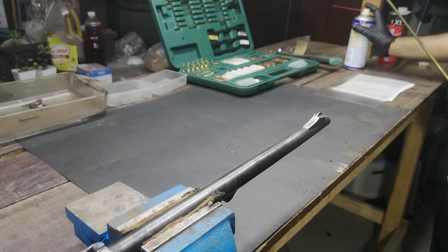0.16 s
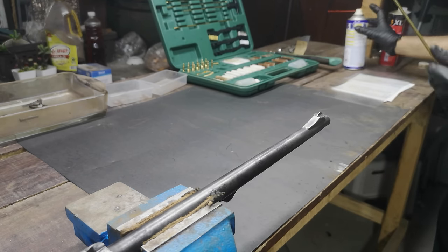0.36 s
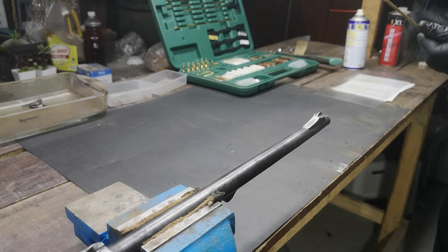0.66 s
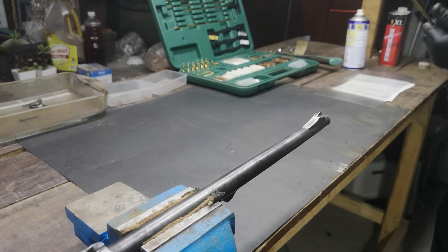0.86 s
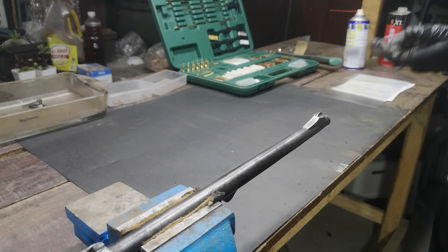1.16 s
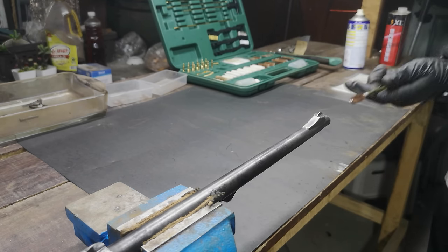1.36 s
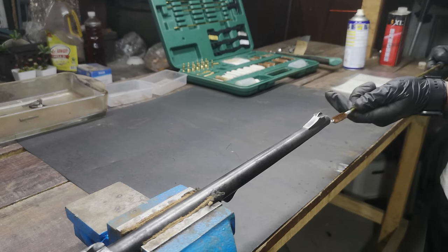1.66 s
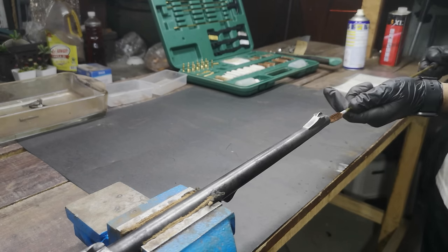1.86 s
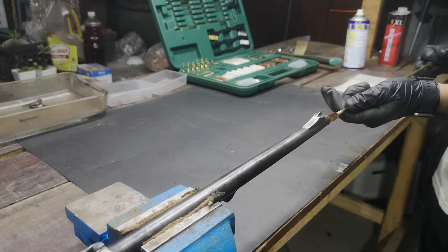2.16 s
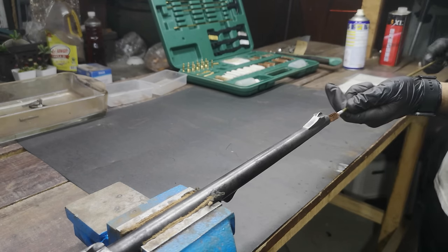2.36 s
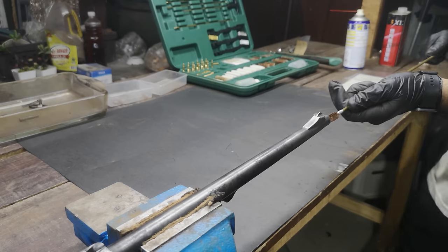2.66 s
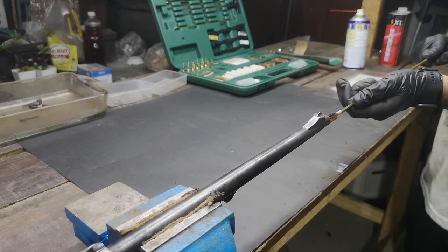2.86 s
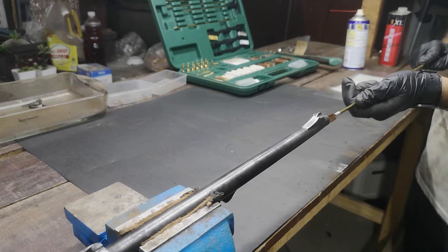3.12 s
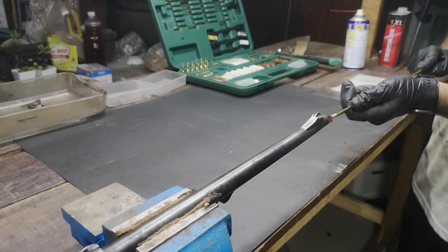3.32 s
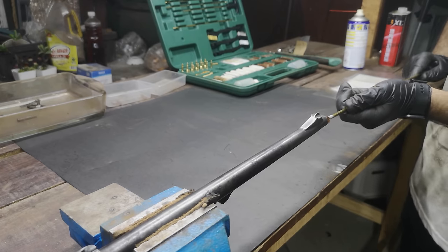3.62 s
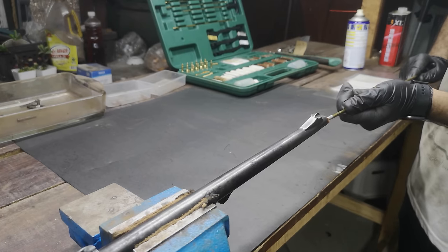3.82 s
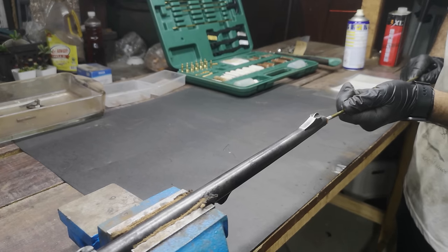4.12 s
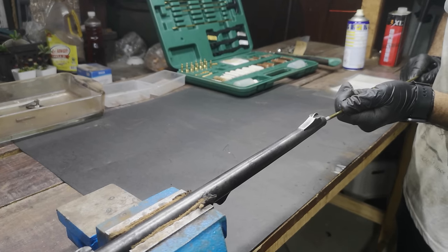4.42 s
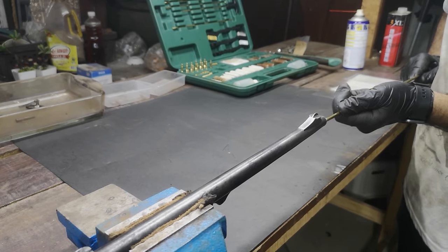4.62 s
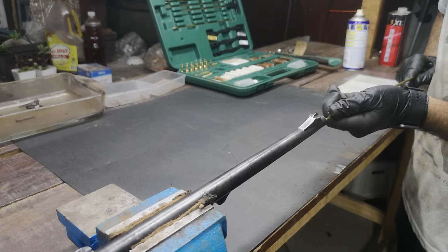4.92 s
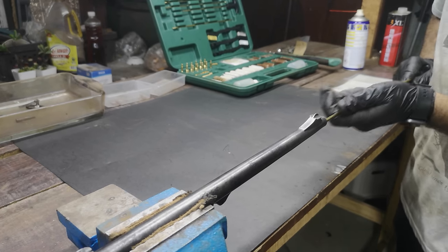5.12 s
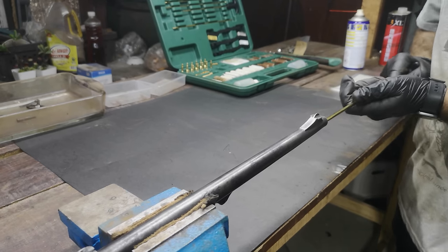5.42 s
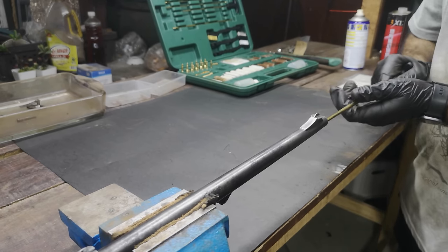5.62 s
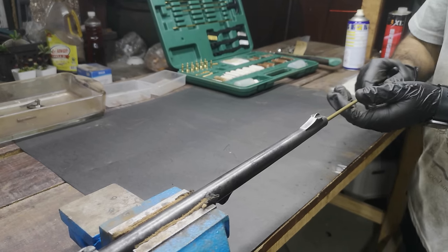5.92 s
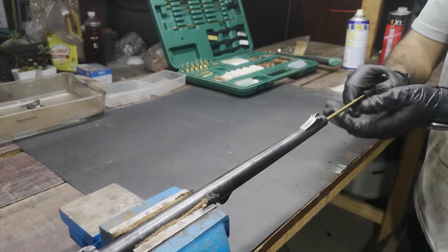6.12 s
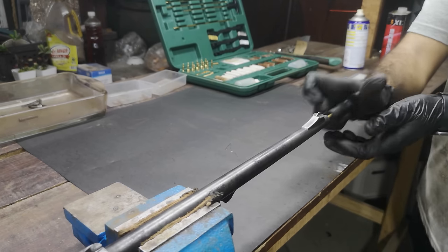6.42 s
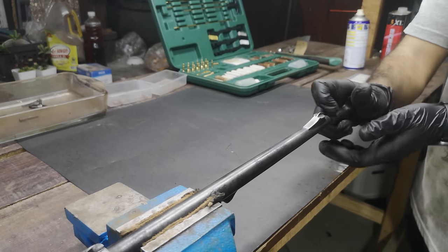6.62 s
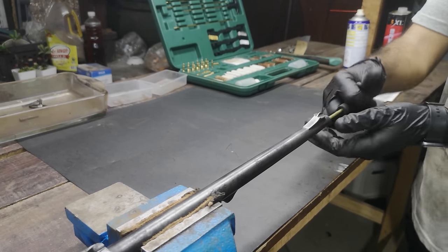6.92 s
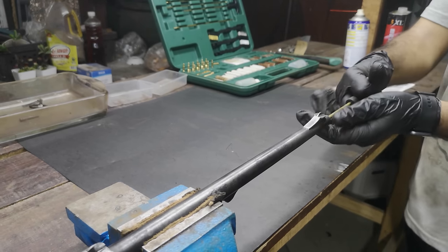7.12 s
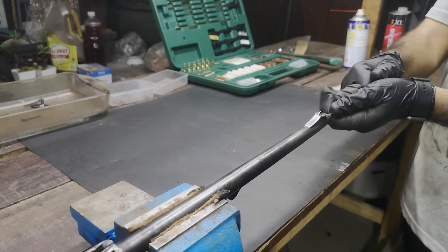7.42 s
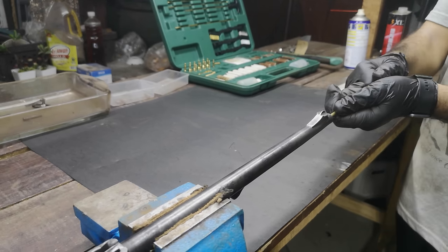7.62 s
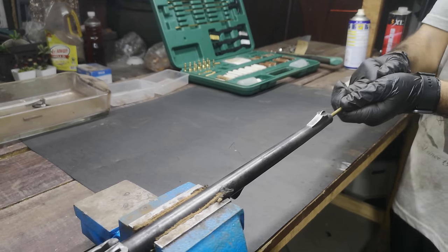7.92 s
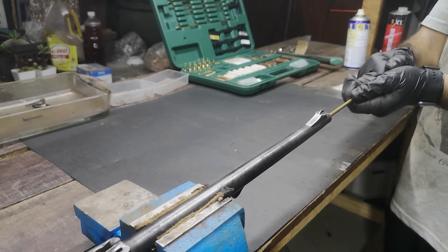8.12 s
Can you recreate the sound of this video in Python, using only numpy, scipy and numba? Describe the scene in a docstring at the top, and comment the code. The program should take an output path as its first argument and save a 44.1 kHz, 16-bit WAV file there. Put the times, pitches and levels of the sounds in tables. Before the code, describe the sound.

A can thumps onto wood, wobbles and settles, leaving near quiet. A bristle brush scratches lightly at the mouth of a metal barrel, then rasps inside it in uneven pushes, the longest sinking in pitch and fading. Sharp steel ticks ring briefly; the rod bumps, a rubber glove squeaks dully and snaps, and the bench shudders softly. Nearby stereo microphones catch short, dense room reflections over a low rumble and faint high whine.

```python
"""A spray can lands on a wooden bench and rocks on its rim; a glove then slides along the rod of a bristle brush.
The bristles flick over the muzzle of a steel barrel held in a vise, then rasp down the bore in short and long pushes.
Along the way come sharp ticks with a steel ring and bumps of the rod; the glove groans and snaps, the bench shudders.
Friction is a train of uneven slips, impact an impulse with chatter; both excite resonant bodies.
A small, live workshop adds dense reflections; faint rumble and a whine persist throughout."""
import sys
import numpy as np
from scipy import signal
from scipy.fft import rfft, irfft
from scipy.io import wavfile
from numba import njit

SR = 44100
rng = np.random.default_rng(int(sys.argv[2]) if len(sys.argv) > 2 else 0)


def bounce(signal):
    """Save signal as a 16-bit WAV file at the path given by the first command-line argument."""
    frames = np.transpose(np.atleast_2d(signal))
    limited = np.clip(frames, -1, 1)
    pcm = np.round(limited * 32767).astype(np.int16)
    wavfile.write(sys.argv[1], SR, pcm)


N = 364707
TIME = np.arange(N) / SR
CLOCK = TIME[::32]  # coarse time axis for the hand's motion
TAPS = 16384  # length of the impulse responses, samples
GRID = np.maximum(np.arange(TAPS // 2 + 1) * SR / TAPS, 1)  # their frequency axis, Hz

# Event levels and colours are relative: each source is scaled again when it is mixed.
# Treble levels are relative to the band below 4500 Hz.

# workshop rumble, spectral density: hz, level_db
AIR_COLOUR = [(15, -33.5), (25, -8), (45, -5), (110, -8), (200, -16.5), (340, -15.5), (520, -25.5),
              (920, -32.5), (1700, -30), (4400, -37), (7300, -38.5), (11000, -48.5), (15500, -52.5)]
AIR_DB = -66.5
WHINE_HZ, WHINE_WIDTH_HZ, WHINE_DB = 7430, 140, -81
# workshop decay time to -60 dB: hz, t60_s
ROOM_T60 = [(100, .3), (500, 0.24), (1500, 0.26), (3000, 0.22), (7000, 0.24), (15000, 0.11)]
# correlation of diffuse sound at the two microphones: hz, likeness (-1 to 1)
LIKENESS = [(60, 1), (150, 1), (280, 0.54), (520, 0.059), (1100, 0.056), (2500, -0.04), (5000, -0.06),
            (12000, -0.78)]
# colour difference of the microphones, left minus right: hz, difference_db
LEAN = [(100, 1), (500, -2), (1300, -1.2), (2400, -2.2), (4400, -2), (6800, -5), (7800, 0), (8800, 5),
        (15000, 10)]
CUTOFF_HZ = 15350

# can landing on the bench: time_s, impulse_db
LANDING = [(0.341, -24), (0.357, -20.5), (0.363, -6), (0.37, -17.5), (0.396, -13.5)]
# can rocking on its rim: time_s, impulse_db
ROCKING = [(0.5332, -8.5), (0.5844, -19), (0.6144, -19.5), (0.6629, -22.5)]
# bench booming as the can lands and as it tips back: start_s, rise_s, hold_s, level_db
BOOM = [(.345, .024, 0.1, -12.5), (.53, 0.027, 0.15, -15.5)]
# bench shuddering under hands that lean on the work: start_s, rise_s, hold_s, level_db
SHUDDERS = [(2.6, 0.078, 0.063, -50.5), (3.3, 0.061, 0.043, -57.5), (4.34, 0.1, 0.063, -40.5),
            (4.66, 0.074, .01, -37.5), (4.82, 0.063, .08, -42), (5.12, 0.18, 1, -49),
            (6.24, 0.038, 0.23, -44.5), (6.5, 0.073, 0.18, -26.5), (7.07, 0.22, 0.043, -34.5),
            (7.38, 0.071, 0.19, -42), (7.6, 0.063, 0.17, -31.5), (7.9, 0.33, 0.063, -34.5)]
BOOM_SAG_DB_PER_S, BOOM_RELEASE_DB_PER_S = 36, 223
SHUDDER_RELEASE_DB_PER_S = 240

# glove sliding along the rod: start_s, rise_s, hold_s, level_db, treble_db
SLIDES = [(1.02, .04, 0.017, -74, 13), (1.228, 0.032, 0.054, -76, 30), (1.308, 0.011, 0.012, -54.5, 10.5),
          (1.45, 0.016, 0.016, -82, 16), (5.98, 0.24, 0.63, -52.5, 6), (7.045, 0.14, .03, -40, -13),
          (7.16, 0.064, 0.068, -35.5, -2.5), (7.41, 0.04, 0.093, -48, -2), (7.92, 0.082, 0.41, -37.5, 3.5)]
# glove snapping on the rod: time_s, impulse_db
SNAPS = [(7.2452, -14.5), (7.351, -20)]
# rod groaning as the grip tightens: start_s, rise_s, hold_s, level_db
GROAN = [(7.07, 0.25, 0.024, -39)]
SLIDE_SAG_DB_PER_S, SLIDE_RELEASE_DB_PER_S = 29, 280
GROAN_RELEASE_DB_PER_S = 77
GROAN_FIRST_HZ, GROAN_REST_HZ, GROAN_SETTLE_S = 218, 164, 0.0804

# sharp ticks with a steel ring, some led by a fainter click about 17 ms earlier: time_s, tick_db, ring_db
TICKS = [(4.3352, -31, -46), (4.3526, -11.5, -30), (4.6603, -29.5, -41.5), (4.6777, -9, -31),
         (7.6211, -24.5, -46), (7.6385, -11, -29), (7.655, -19, -33.5), (7.6682, -15.5, -48),
         (7.682, -21, -65), (7.7819, -27, -72), (7.7997, -9, -36.5)]
# rod bumping the muzzle as the grip changes: time_s, impulse_db
BUMPS = [(6.6185, -8), (6.6703, -5.5)]

# bristles flicked against the muzzle: start_s, rise_s, hold_s, level_db, treble_db
MUZZLE = [(2.31, .08, 0.088, -49.5, -4), (2.568, 0.057, 0.027, -27.5, -1.5),
          (2.755, 0.016, 0.028, -56.5, -7), (2.98, 0.045, 0.056, -64, -4), (3.135, 0.026, 0.011, -45, -4),
          (3.297, 0.045, 0.035, -31.5, -2.5)]
FLICK_SAG_DB_PER_S, FLICK_RELEASE_DB_PER_S = 32, 222
# short pushes in the bore: start_s, rise_s, hold_s, level_db, treble_db, first_rasp_hz, rasp_lift_db
PUSHES = [(3.458, 0.031, 0.028, -37, -16, 1400, -38), (3.679, 0.041, 0.0062, -38.5, -13.5, 1400, 8.5),
          (3.867, 0.058, 0.022, -65.5, -7.5, 1410, 4), (4.059, 0.047, 0.14, -63, -5.5, 1400, 15),
          (4.5, 0.038, 0.051, -51.5, -17, 1400, -13), (4.715, 0.16, 0.062, -21.5, -8.5, 1300, -28),
          (5.077, 0.084, 0.07, -18.5, -0.5, 3500, 13.5), (7.405, 0.034, 0.067, -42.5, -10.5, 7370, 3.5),
          (7.596, 0.015, .012, -40.5, -1.5, 6100, 14), (7.928, 0.035, .11, -37.5, -7.5, 7260, 9),
          (8.028, 0.17, 0.11, -20, -11.5, 1783, -7)]
PUSH_SAG_DB_PER_S, PUSH_RELEASE_DB_PER_S = 16.5, 273
# the long push down the bore: time_s, level_db, treble_db
LONG_PUSH = [(5.345, -34.5, 4), (5.393, -16.5, -2), (5.649, -18.5, -6), (5.951, -23.5, -2.5),
             (5.985, -28.5, -3.5), (6.161, -28, -16.5), (6.221, -27, -11.5), (6.509, -36, -5),
             (6.537, -30.5, -9.5), (6.59, -35.5, -22)]
# rasp of the bristles during the long push: time_s, pitch_hz, lift_db
RASP = [(5.36, 3530, 9.5), (5.5, 2600, 1), (5.6, 2070, -40), (5.8, 2530, 0), (5.939, 2700, 9.5),
        (6.08, 2050, -12.5), (6.23, 1750, 14), (6.5, 2060, 5)]
RASP_REST_HZ, BEND_S = 1260, 0.1  # as the bristles bend, the rasp sinks to this pitch with this time constant
# open bore between muzzle and brush: time_s, depth_m
DEPTH = [(5.1, .064), (5.35, .078), (5.56, .124), (5.75, .146), (5.95, .21), (6.05, .225), (8.27, .24)]
BRUSH_REFLECTS, ECHO_REACH_M = .55, .21  # share the brush sends back; depth at which it has halved
ECHO_CUT_HZ = 3500

# resonances, with the lift before each use scales it by "ringing": hz, width_hz, lift_db
BENCH = [(99, 12, 6.5), (130.4, 14, 15.5), (169.2, 17, 12), (287.7, 24, 6), (321, 16, 12.5), (419, 15, 5),
         (485, 12, 2)]
# likewise of the can: hz, width_hz, lift_db
CAN = [(1570, 130, 10), (2050, 100, 2), (2560, 420, 5.5), (4200, 1200, 5.5)]
# likewise of barrel and rod: hz, width_hz, lift_db
BARREL = [(683, 42, 10.5), (1161.5, 15, 12.5), (1413, 23, 16.5), (1730, 54, 4.5), (1917, 210, 10.5),
          (2700, 510, 11.5), (2800, 34, -19), (3080, 30, -12.5), (3987, 95, 10), (5598, 139, 19.5),
          (6000, 320, -3), (7570, 930, 10.5), (9160, 180, 7.5)]

# broad spectral densities of the can landing: hz, level_db
LANDING_COLOUR = [(60, -24), (140, -3), (300, -11), (550, -7.5), (850, -6.5), (1350, -9), (1800, -13.5),
                  (2700, -19), (4200, -36), (6000, -48.5), (9000, -79)]
# of the can's rim: hz, level_db
RIM_COLOUR = [(260, -26.5), (450, -13), (725, -3), (979, -8), (1540, -12.5), (2350, -16.5), (2910, -26),
              (4810, -36), (9000, -61), (11700, -102), (19800, -120)]
# of the booming bench: hz, level_db
BENCH_COLOUR = [(20, -33), (35, -13), (60, -9.5), (125, -4), (200, -7), (330, -7.5), (480, -17),
                (900, -26.5), (2000, -80)]
# of the shuddering bench: hz, level_db
SHUDDER_COLOUR = [(20, -22), (45, 9.5), (80, -4), (125, 0.5), (172, -1.5), (240, 4.5), (330, -9),
                  (480, -10.5), (900, -8.5), (2000, -86.5)]
# of the glove's hiss: hz, level_db
GLOVE_COLOUR = [(290, -21), (550, -23), (1030, -12.5), (1900, 2), (3300, 0), (4800, -1.5), (7100, 7),
                (9000, -6.5), (10700, -19.5), (15500, -20)]
# of the glove's snap: hz, level_db
SNAP_COLOUR = [(400, -29), (1500, -3), (3300, 10), (5500, 5), (8000, -23), (15000, -63)]
# of the steel ring: hz, level_db
RING_COLOUR = [(120, -48.5), (450, -15.5), (750, -4.5), (1100, 6), (1700, 4), (2150, -2), (2750, 7),
               (3600, -4), (5600, -6.5), (8000, -16.5), (10000, -29), (15000, -38.5)]
# of the sharp tick: hz, level_db
TICK_COLOUR = [(500, -27), (2000, -1.5), (4000, -10.5), (5600, 7.5), (7000, -6.5), (8700, -6),
               (10500, -18.5), (15500, -34)]
# of a bump damped by the hand: hz, level_db
BUMP_COLOUR = [(180, -50), (300, -17.5), (610, -31), (690, -4.5), (806, -19), (926, -8), (1540, -7),
               (1850, -1), (2860, -6.5), (3490, -29.5), (5550, -34), (12000, -66), (15600, -113.5),
               (22000, -120)]
# of bristles at the muzzle: hz, level_db
MUZZLE_COLOUR = [(120, -17.5), (400, -21), (700, -20), (1050, -8.5), (1400, -1), (1900, 0.5), (2400, 1.5),
                 (3300, 1), (4500, -1), (6000, 0.5), (7600, -6), (9500, -15.5), (15500, -35.5)]
# of bristles in the bore: hz, level_db
BORE_COLOUR = [(100, -32), (500, -29.5), (750, -18.5), (1050, -2.5), (1600, -1.5), (2400, -3.5), (3200, -1),
               (4600, -12.5), (6400, -11.5), (7800, -10.5), (10200, -15), (13000, -20), (15500, -34)]


def from_db(db):
    """Amplitude ratio: twenty decibels make a factor of ten."""
    return 10 ** (np.asarray(db) / 20)


def rms_one(x):
    """Normalization: the root mean square becomes 1."""
    return x / np.sqrt(np.mean(x ** 2) + 1e-20)


def at_hz(points, hz):
    """Logarithmic frequency scale: a table is interpolated along log frequency."""
    f, value = np.transpose(points)
    return np.interp(np.log(hz), np.log(f), value)


def convolve(x, response):
    """Linear superposition: a signal passes through one impulse response per channel."""
    return signal.oaconvolve(np.atleast_2d(x), np.atleast_2d(response), axes=1)[:, :N]


def causal(level_db):
    """Minimum phase: the levels on the frequency grid fix a causal impulse response."""
    both_sides_db = np.r_[level_db, level_db[-2:0:-1]]
    log_gain = np.log(from_db(both_sides_db))
    spectrum = np.exp(np.conj(signal.hilbert(log_gain)))
    return irfft(spectrum[:len(GRID)])


def body(x, colour, modes=(), ringing=1):
    """Modal resonance: modes lift or lower a broad colour; white noise keeps its level."""
    lift = 1  # power ratio
    for hz, width, db in modes:
        lift = lift + (from_db(2 * db * ringing) - 1) / (1 + (2 * (GRID - hz) / width) ** 2)
    response = causal(at_hz(colour, GRID) + 10 * np.log10(np.maximum(lift, .1)))
    return convolve(x, response / np.linalg.norm(response))[0]


@njit
def moving_resonance(x, angle, radius):
    """Two-pole resonance: the centre glides and the gain at the peak is about 1."""
    y = np.zeros(len(x))
    for i in range(2, len(x)):
        drive = (1 - radius ** 2) / 2 * (x[i] - x[i - 2])
        y[i] = drive + 2 * radius * np.cos(angle[i]) * y[i - 1] - radius ** 2 * y[i - 2]
    return y


def bristles(per_s, spread_db, judder_db, judder_hz):
    """Stick-slip friction: random tiny slips of uneven size, their strength varied by the judder of the hand."""
    lowpass = signal.butter(2, judder_hz, fs=SR, output="sos")
    judder = rms_one(signal.sosfilt(lowpass, rng.standard_normal(N)))
    sizes = from_db(spread_db * np.minimum(rng.exponential(1, N), 4) + judder_db * judder)
    occurs = rng.random(N) < per_s / SR
    return rms_one(occurs * sizes * rng.choice([-1, 1], N))


def rub(texture, gains):
    """Sliding friction: pressure sets the level, speed the share of treble."""
    low, high = (rms_one(signal.sosfilt(signal.butter(5, 4500, kind, fs=SR, output="sos"), texture))
                 for kind in ("low", "high"))
    return low * gains[0] + high * gains[1]


def strokes(rows, sag_db_per_s, release_db_per_s, treble=False):
    """Stroke envelope: each swells as a squared sine, sags while held, then decays exponentially."""
    gain = 0
    for start, rise, hold, level_db, *more in rows:
        age = CLOCK - start
        swell = np.sin(np.pi / 2 * np.clip(age / rise, 0, 1)) ** 2
        sag_db = sag_db_per_s * np.clip(age - rise, 0, hold)
        release_db = release_db_per_s * np.clip(age - rise - hold, 0, 1)
        treble_db = more[0] if treble else 0
        gain = gain + swell * from_db(level_db - sag_db - release_db + treble_db)
    return np.interp(TIME, CLOCK, gain)


def pressure_and_speed(rows, sag_db_per_s, release_db_per_s):
    """Two-band friction: gains of the lower band and of the treble for a run of strokes."""
    return np.array([strokes(rows, sag_db_per_s, release_db_per_s, treble) for treble in (False, True)])


def contacts(rows, chatter_s, chatter_db, column=1):
    """Impact: each contact is one impulse and a dying chatter of the touching surfaces."""
    force, age = np.zeros(N), np.arange(SR // 8) / SR
    for row in rows:
        blow = rng.standard_normal(len(age)) * np.exp(-age / chatter_s)
        blow *= from_db(chatter_db) / np.linalg.norm(blow)  # chatter energy relative to the impulse
        blow[0] += 1
        at = round(row[0] * SR)
        force[at:at + len(age)] += from_db(row[column]) * blow[:N - at]
    return force


def two_ears(count):
    """Diffuse-field coherence: noise at two microphones, alike in the bass and opposed at the very top."""
    mid, side = rfft(rng.standard_normal((2, count)))
    hz = np.maximum(np.arange(len(mid)) * SR / count, 1)
    alike = np.clip(at_hz(LIKENESS, hz), -1, 1)
    shared = np.sqrt((1 + alike) / 2) * mid
    opposed = np.sqrt((1 - alike) / 2) * side
    return irfft(shared + opposed * [[1], [-1]], count)


def workshop(build_s):
    """Reverberation: dense reflections build up and decay, the highest treble soonest; unit energy."""
    noise, age, tail = rfft(two_ears(TAPS)), TIME[:TAPS], 0
    for k, (_, t60) in enumerate(ROOM_T60):
        weights = [(f, j == k) for j, (f, _) in enumerate(ROOM_T60)]
        band = irfft(noise * at_hz(weights, GRID))
        tail = tail + band * from_db(-60 * age / t60) / np.sqrt(t60)
    tail = tail * (1 - np.exp(-age / build_s))
    return tail / np.linalg.norm(tail, axis=1, keepdims=True)


def place(x, room, direct_db, lag_ms):
    """Interaural delay: direct sound reaches the left microphone later by the lag; the room is added."""
    direct = np.array([np.interp(TIME - lag_ms / 1000, TIME, x), x])
    mixture = from_db(direct_db) * direct + convolve(x, room)
    return mixture / np.hypot(1, from_db(direct_db))


def still_air():
    """Stationary noise: a diffuse rumble and a thin electrical whine of narrow bandwidth."""
    rumble = np.array([body(side, AIR_COLOUR) for side in two_ears(N)])
    whine_level_db = -20 * np.log10(1 + ((GRID - WHINE_HZ) / WHINE_WIDTH_HZ) ** 2)
    whine = convolve(two_ears(N), causal(whine_level_db))
    return from_db(AIR_DB) * rumble + from_db(WHINE_DB) * rms_one(whine)


def can_and_bench(room):
    """Forced vibration: impacts excite can and bench; noise makes the bench boom, and shudder under the hands."""
    landing = body(contacts(LANDING, chatter_s=0.045, chatter_db=9), LANDING_COLOUR, BENCH)
    rim = body(contacts(ROCKING, chatter_s=0.004, chatter_db=-2), RIM_COLOUR, CAN)
    impacts = from_db(14) * landing + from_db(15.5) * rim

    boom = body(rng.standard_normal(N), BENCH_COLOUR, BENCH)
    boom = from_db(-4.5) * boom * strokes(BOOM, BOOM_SAG_DB_PER_S, BOOM_RELEASE_DB_PER_S)
    shudder = body(rng.standard_normal(N), SHUDDER_COLOUR, BENCH, ringing=0.59)
    shudder = from_db(-11.5) * shudder * strokes(SHUDDERS, 0, SHUDDER_RELEASE_DB_PER_S)
    return (place(impacts, room, direct_db=-7.5, lag_ms=0.076)
            + place(boom + shudder, room, direct_db=3.5, lag_ms=.02))


def gloves(room):
    """Stick-slip of rubber: it hisses along the rod, groans as it grips, and now and then snaps free."""
    slips = bristles(per_s=3000, spread_db=3.5, judder_db=2, judder_hz=110)
    slide_gains = pressure_and_speed(SLIDES, SLIDE_SAG_DB_PER_S, SLIDE_RELEASE_DB_PER_S)
    hiss = from_db(0.5) * rub(body(slips, GLOVE_COLOUR), slide_gains)
    snaps = from_db(11) * body(contacts(SNAPS, chatter_s=.002, chatter_db=5), SNAP_COLOUR)

    age = np.maximum(TIME - GROAN[0][0], 0)
    hz = GROAN_REST_HZ + (GROAN_FIRST_HZ - GROAN_REST_HZ) * np.exp(-age / GROAN_SETTLE_S)
    stick_slip = signal.sawtooth(2 * np.pi * np.cumsum(hz) / SR) + 12 * rng.standard_normal(N)
    radius = np.exp(-np.pi * 35 / SR)  # 35 Hz wide
    groan = rms_one(moving_resonance(stick_slip, 2 * np.pi * hz / SR, radius))
    groan = body(groan, [(250, -2.0), (900, -27.5)])  # (Hz, dB): a dull colour
    groan = from_db(-18.0) * groan * strokes(GROAN, 0, GROAN_RELEASE_DB_PER_S)
    return (place(hiss, room, direct_db=-9.5, lag_ms=0.18)
            + place(snaps, room, direct_db=-2, lag_ms=0.05) + groan)


def ticks_and_bumps(room):
    """Impact on steel: a sharp tick excites a ring; damped by the hand the rod only bumps."""
    ring_force = contacts(TICKS, chatter_s=0.067, chatter_db=5.0, column=2)
    ring = from_db(39.5) * body(ring_force, RING_COLOUR, BARREL, ringing=0.62)
    tick = from_db(1) * body(contacts(TICKS, chatter_s=0.0019, chatter_db=18), TICK_COLOUR)
    bump_force = contacts(BUMPS, chatter_s=0.0046, chatter_db=-6.5)
    bump = from_db(18.5) * body(bump_force, BUMP_COLOUR, BARREL, ringing=0.45)
    return (place(ring, room, direct_db=-30.5, lag_ms=0.031) + place(tick, room, direct_db=7.5, lag_ms=0.06)
            + place(bump, room, direct_db=-6.5, lag_ms=0.16))


def brush_at_muzzle(room):
    """Weak coupling: bristles flick over the crown in the open air and hardly stir the steel."""
    slips = bristles(per_s=4000, spread_db=3.5, judder_db=2, judder_hz=90)
    flicks = body(slips, MUZZLE_COLOUR, BARREL, ringing=0.23)
    gains = pressure_and_speed(MUZZLE, FLICK_SAG_DB_PER_S, FLICK_RELEASE_DB_PER_S)
    return place(rub(flicks, gains), room, direct_db=-15.5, lag_ms=0.11)


def long_push(lead_s=0.011, fade_s=0.0062, treble_lift_db=1):
    """Two-band friction of the long push; the motion runs a little ahead of the room's build-up."""
    s, level_db, treble_db = np.transpose(LONG_PUSH)
    s = s - lead_s
    outside = np.clip(np.maximum(s[0] - TIME, TIME - s[-1]) / fade_s, 0, 20)
    low_db = np.interp(TIME, s, level_db)
    high_db = np.interp(TIME, s, level_db + treble_db + treble_lift_db)
    return np.exp(-outside) * from_db([low_db, high_db])


def rasp_tuning():
    """Bending stiffness: the rasp sinks toward its rest pitch in each short push, and wanders in the long one."""
    start, *_, first_hz, lift_db = np.transpose(PUSHES)
    push = np.maximum(np.searchsorted(start, TIME) - 1, 0)  # the latest push begun
    age = np.maximum(TIME - start[push], 0)
    short_hz = RASP_REST_HZ + (first_hz[push] - RASP_REST_HZ) * np.exp(-age / BEND_S)
    s, long_hz, long_db = np.transpose(RASP)
    in_long = (TIME > LONG_PUSH[0][0]) & (TIME < LONG_PUSH[-1][0])
    hz = np.where(in_long, np.interp(TIME, s, long_hz), short_hz)
    return hz, from_db(np.where(in_long, np.interp(TIME, s, long_db), lift_db[push]))


@njit
def air_column(x, round_trip, reflection, dullness):
    """Pipe closed by the brush: the echo returns inverted and duller, its treble lost at the open muzzle."""
    y, echo = x.copy(), 0.0
    for i in range(400, len(x)):
        at = i - round_trip[i]
        k = int(at)
        delayed = y[k] + (at - k) * (y[k + 1] - y[k])
        echo = dullness * echo + (1 - dullness) * delayed
        y[i] -= reflection[i] * echo
    return y


def brush_in_bore(rooms, rasp_width_hz=520, sway_s=0.7306):
    """Coupled resonators: bristles rasp over rifling, steel rings, the air column's pitch falls with depth."""
    hz, lift = rasp_tuning()
    slips = bristles(per_s=8000, spread_db=2.7, judder_db=1.3, judder_hz=140)
    rasp = moving_resonance(slips, 2 * np.pi * hz / SR, np.exp(-np.pi * rasp_width_hz / SR))
    # the rasp draws its energy from the other slips
    slips = (slips + lift * rasp) / np.sqrt(1 + 0.21 * lift * (2 + lift))

    depth = np.interp(TIME, *np.transpose(DEPTH))
    round_trip = 2 * depth / 343 * SR  # samples, at a sound speed of 343 m/s
    reflection = BRUSH_REFLECTS / (1 + (depth / ECHO_REACH_M) ** 10)
    air = air_column(slips, round_trip, reflection, np.exp(-2 * np.pi * ECHO_CUT_HZ / SR))
    steel = body(air, BORE_COLOUR, BARREL, ringing=0.86)
    short_pushes = pressure_and_speed(PUSHES, PUSH_SAG_DB_PER_S, PUSH_RELEASE_DB_PER_S)
    scrape = rub(steel, short_pushes + long_push())

    turn = TIME / sway_s  # radians: the moving arms slowly change the pattern of reflections
    reflected = convolve(scrape * np.cos(turn), rooms[0]) + convolve(scrape * np.sin(turn), rooms[1])
    return from_db(-0.5) * reflected + from_db(-4.0) * scrape


def scene():
    """Superposition: the sources add, with separate reflection patterns for all but the groan and still air."""
    rooms = [workshop(build_s=0.00064) for _ in range(6)]
    background = still_air() + can_and_bench(rooms[5])
    handling = gloves(rooms[4]) + ticks_and_bumps(rooms[3])
    return background + handling + brush_at_muzzle(rooms[2]) + brush_in_bore(rooms[:2])


def record(dry):
    """Transducer response: the two microphones differ in colour; peaks clip and the top is cut."""
    lean_db = at_hz(LEAN, GRID) / 2
    heard = np.clip(convolve(dry, [causal(lean_db), causal(-lean_db)]), -1, 1)
    return signal.sosfilt(signal.ellip(10, .1, 80, CUTOFF_HZ, fs=SR, output="sos"), heard)


dry = scene()
out = record(dry)
bounce(out)
```